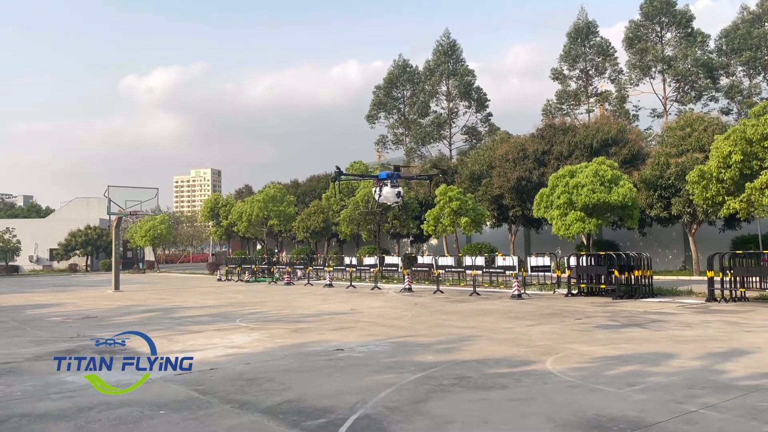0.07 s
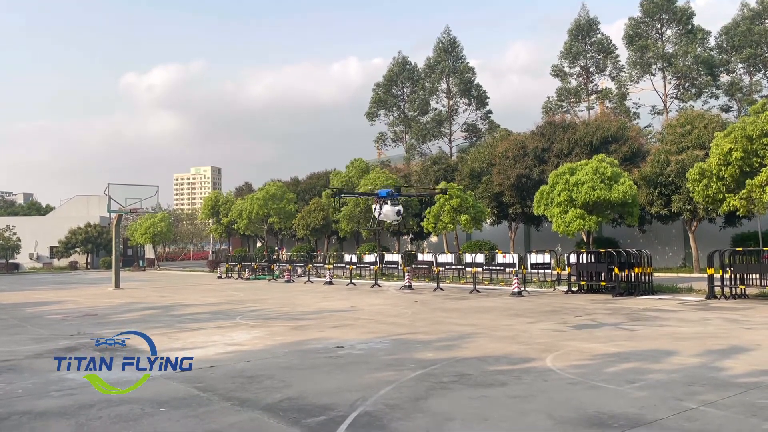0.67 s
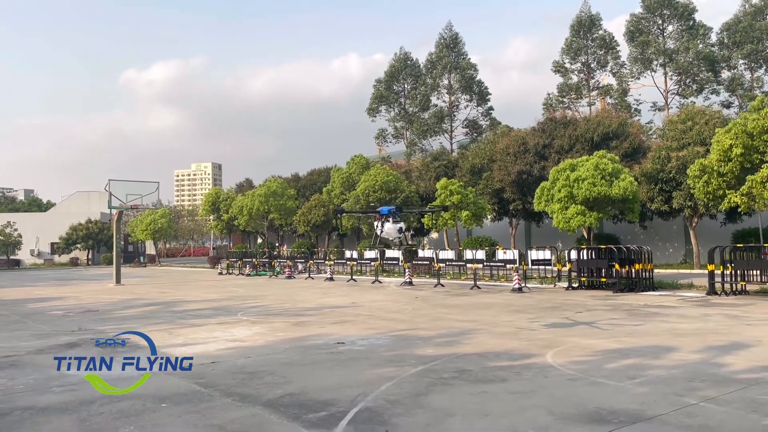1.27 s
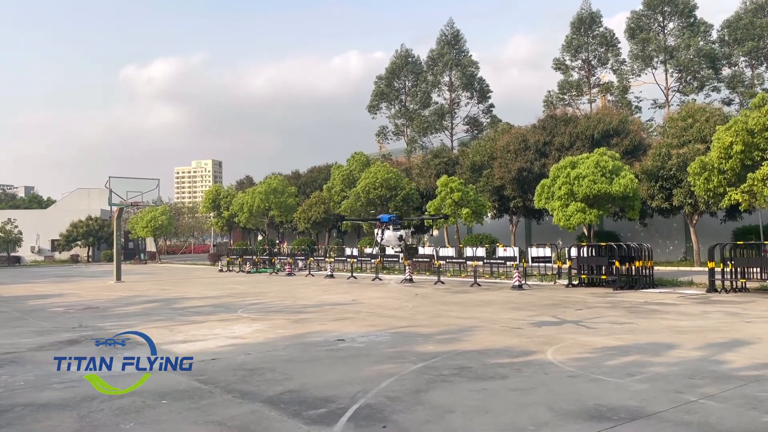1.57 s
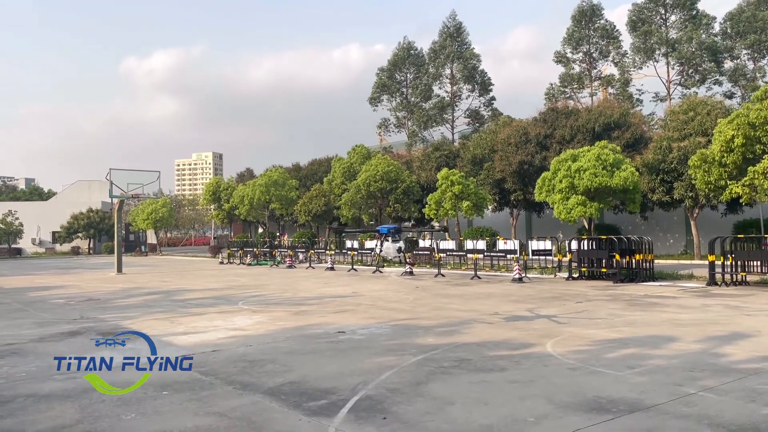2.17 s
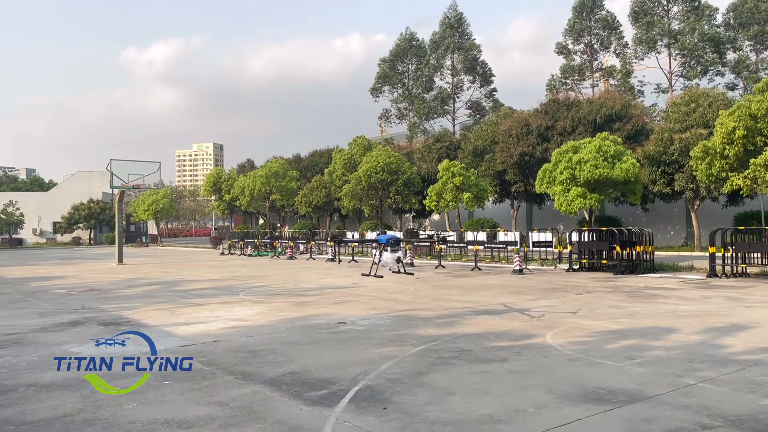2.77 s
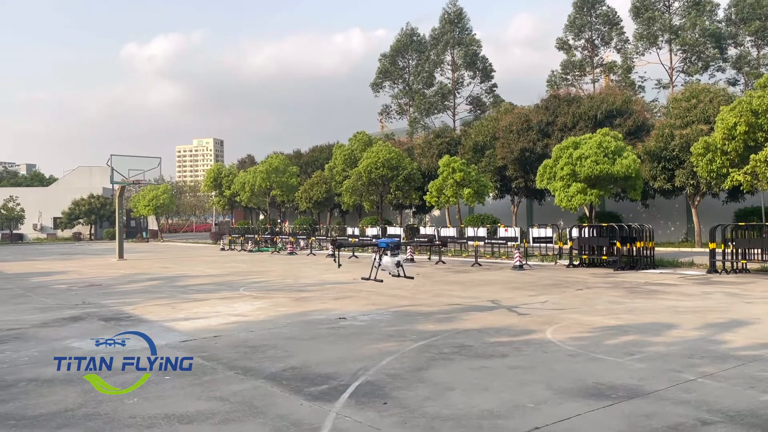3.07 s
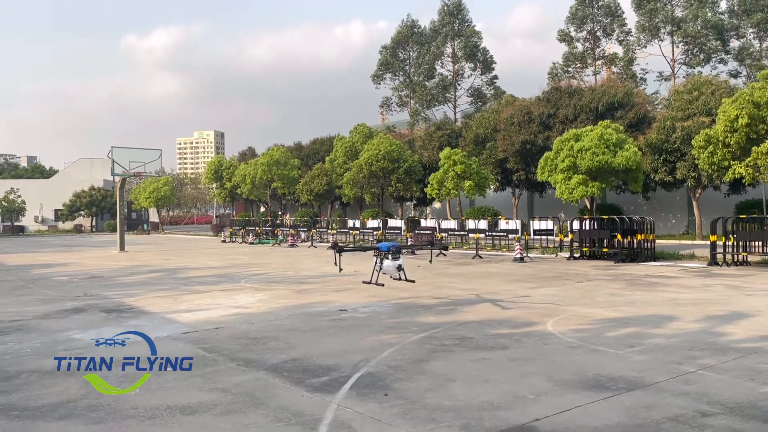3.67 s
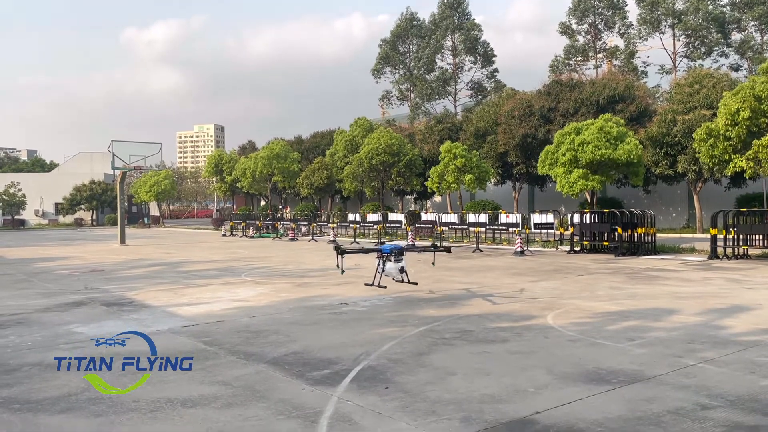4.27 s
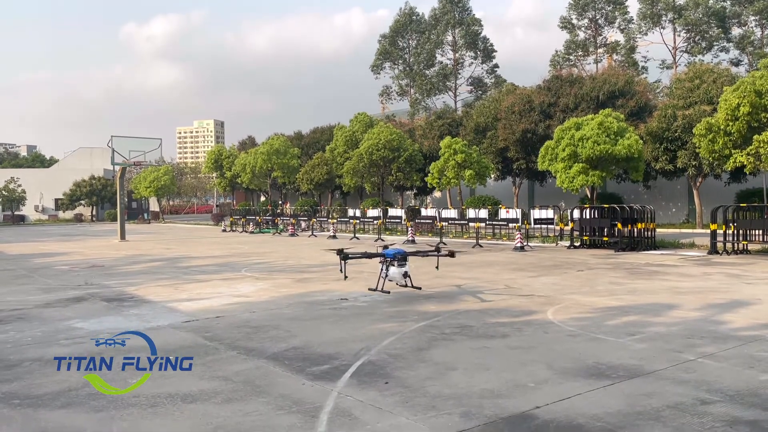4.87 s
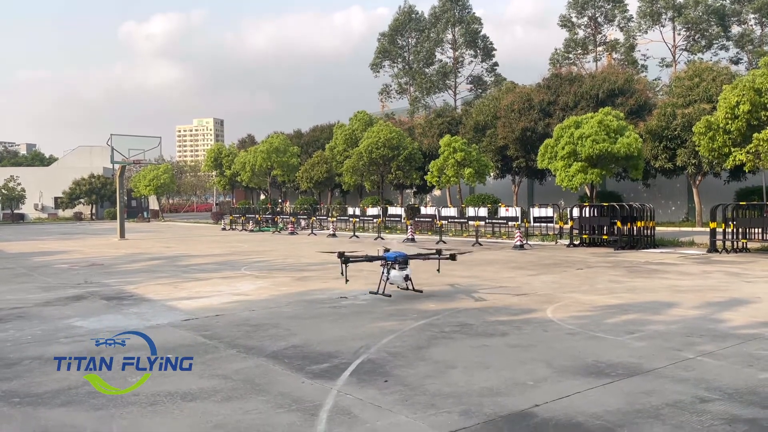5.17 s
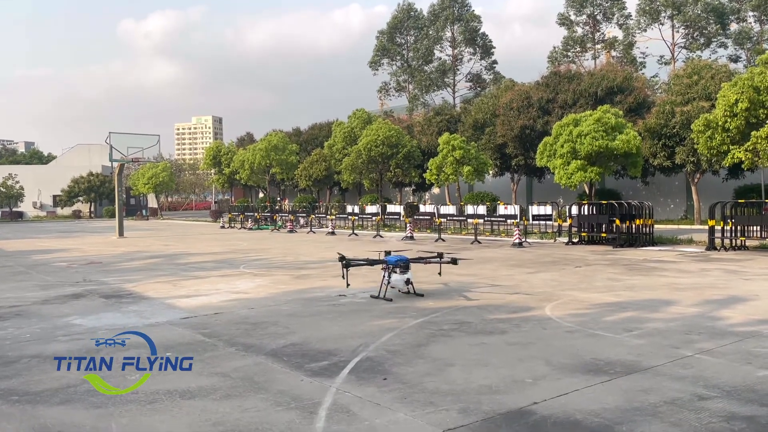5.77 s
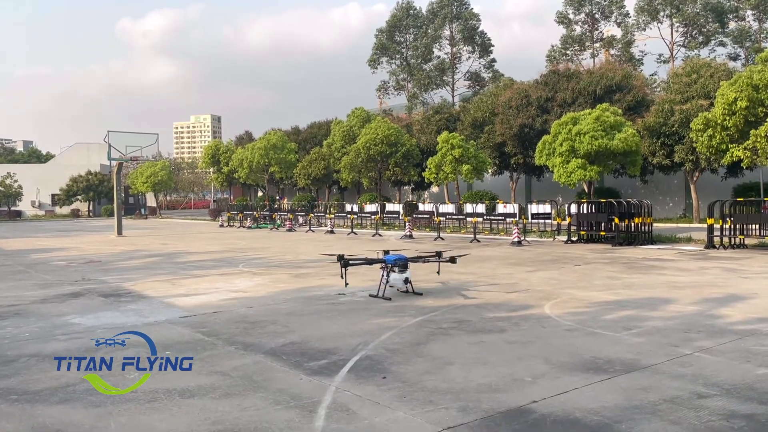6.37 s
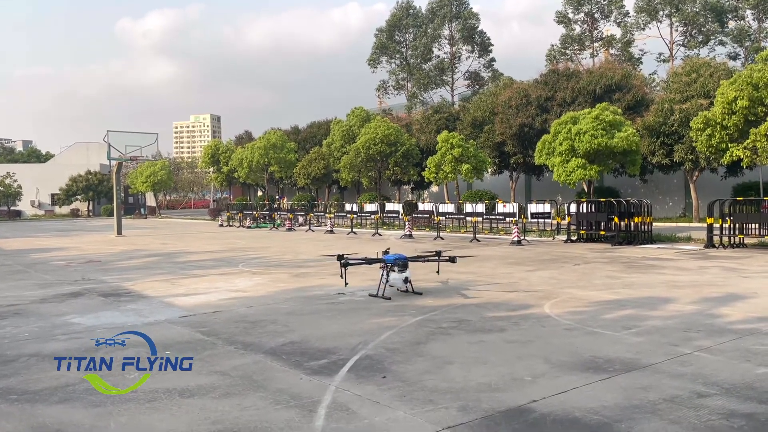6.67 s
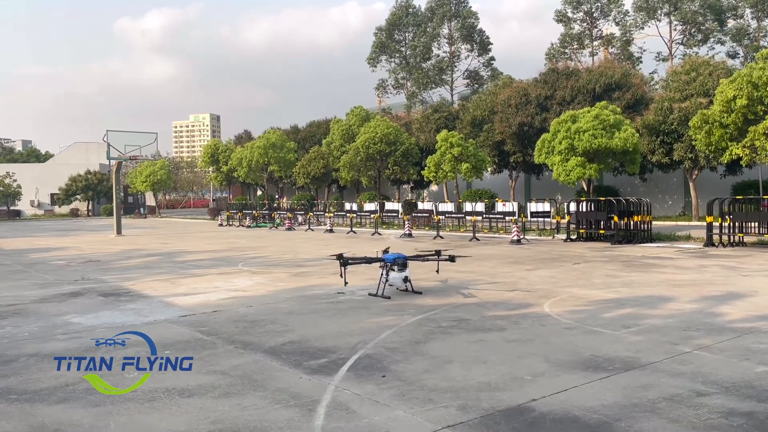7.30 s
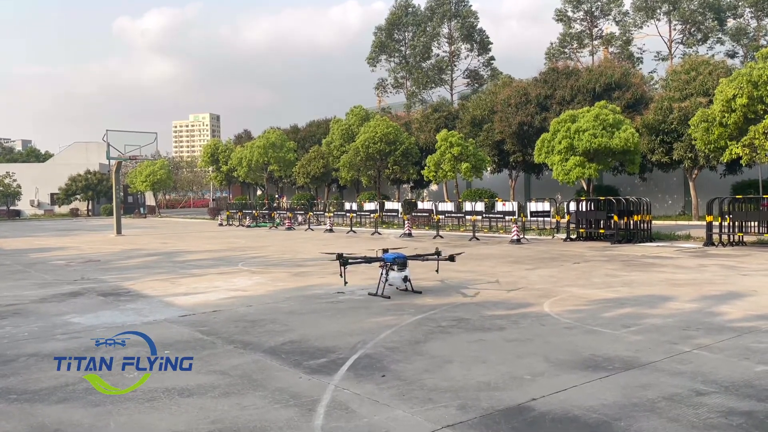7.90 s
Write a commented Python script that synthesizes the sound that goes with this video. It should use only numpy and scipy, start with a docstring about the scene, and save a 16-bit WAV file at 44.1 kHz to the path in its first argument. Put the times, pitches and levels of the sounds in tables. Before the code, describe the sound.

A large six-rotor drone descends over an open concrete court, close to a stereo microphone. Its blades give a throbbing hum and a choppy, hissing buzz, with a faint high electronic whine above and downwash rumbling below. At touchdown the hum surges twice and gusts thump the microphone. The motors whine and squeak as they slow to idle, and dry litter scrapes faintly over the ground.

```python
"""A large six-rotor drone lands on an open-air concrete court, close to a two-port stereo microphone.
It sinks from about two metres, blades humming and chopping the air, speed controllers singing high
above, downwash rumbling on the microphone. Near 5.7 s it touches down: the hum surges twice, then gusts
and eddies strike the microphone. The motors whine and squeak as they brake to idle. From 7 s dry litter
scrapes over the concrete, and in the last half second the rotors coast slower still."""
import sys
import numpy as np
from scipy import signal
from scipy.fft import rfft, irfft, next_fast_len
from scipy.io import wavfile
from scipy.ndimage import uniform_filter1d, map_coordinates

SR = 44100
rng = np.random.default_rng(int(sys.argv[2]) if len(sys.argv) > 2 else 0)


def master(y):
    """Save y as 16-bit WAV."""
    cut = np.clip(np.atleast_2d(y).T, -1, 1)
    pcm = np.round(cut * 32767)  # scale
    wavfile.write(sys.argv[1], SR, pcm.astype(np.int16))


N = 354563
T = np.arange(N) / SR
HZ = np.fft.rfftfreq(N, 1 / SR)

# common rotor speed through descent, touchdown, braking, idle, coasting: (time [s], blade rate [Hz])
BLADE_RATE = [(0, 72.1), (1.4, 71.4), (2.36, 71.4), (2.8, 73), (3.7, 72.9), (4.4, 70.6), (5.58, 69.7),
              (5.76, 62.7), (5.95, 62.6), (6.25, 58.4), (6.37, 51), (6.56, 36.8), (6.67, 29.8),
              (6.76, 34.3), (6.9, 30.9), (7.15, 29.2), (7.59, 28.8), (8.04, 22)]
# rotors above the concrete: (time [s], height [m])
ROTOR_HEIGHT = [(0, 1.86), (1, 1.68), (2, 1.17), (3, 1.04), (5.7, 1.12)]
# each rotor against the common speed, before TRIM_SPREAD scales it: (blade rate offset [Hz])
ROTOR_TRIM = [-1.9, -.8, -.2, .35, 1, 2.1]
# the rotors part most while the drone steadies near the ground: (time [s], offset scale [ratio])
TRIM_SPREAD = [(1, 0.86), (2.2, 0.39), (2.8, 1.15), (3.7, 1.25), (4.6, 0.51)]
# each rotor at the microphone, the nearest loudest: (relative level [dB])
ROTOR_NEARNESS = [1, -7.5, -3.5, -2, 6, -6.5]
# first blade tone, the deep hum, at hovering speed: (time [s], relative level [dB])
HUM_LEVEL = [(0, -36), (.2, -33), (.65, -32.5), (.85, -30.5), (1.03, -39), (1.2, -29), (1.33, -35),
             (1.5, -23.5), (1.68, -30), (1.8, -29.5), (2.1, -27), (2.22, -33), (2.66, -34), (2.8, -26.5),
             (3.1, -34.5), (3.35, -28.5), (3.75, -35), (3.97, -24.5), (4.45, -35), (4.72, -24),
             (4.9, -39.5), (5.15, -31), (5.33, -56), (5.9, -40)]
# second and third blade tones at hovering speed: (time [s], second [relative dB], third [relative dB])
OVERTONE_LEVELS = [(0, -36, -40), (1.1, -42.5, -35), (2.1, -40, -35), (2.5, -44.5, -37.5),
                   (3.3, -37, -33.5), (4.5, -35, -33), (4.85, -40.5, -47), (5.15, -40, -34),
                   (5.9, -34, -38.5)]
# higher blade tones at hovering speed: (time [s], fourth tone [dB], all above it [dB])
BUZZ_LEVELS = [(0, -32, -28), (.3, -37.5, -30.5), (.8, -42, -34.5), (1.2, -40.5, -37), (2.2, -40.5, -35.5),
               (2.9, -34, -33.5), (3.6, -37.5, -35), (4.2, -35, -34.5), (4.6, -40.5, -33),
               (5.1, -37.5, -34.5), (5.6, -37.5, -35), (6.15, -36.5, -36)]
# blade tones above the fourth, at the opening speed: (frequency [Hz], relative level [dB])
BUZZ_SPECTRUM = [(365, 1.5), (435, -4.5), (510, -1.5), (580, -2.5), (660, -8.5), (800, -15), (1080, -8),
                 (1500, -15), (2400, -16.5)]
# blade turbulence at hovering speed: (time [s], rush [relative dB], tip hiss [relative dB])
TURBULENCE_LEVELS = [(0, -34.5, -39), (.7, -32.5, -39.5), (2.25, -30.5, -40.5), (2.65, -30, -39),
                     (3.3, -30, -38.5), (4.3, -31.5, -38), (4.95, -34, -40), (5.25, -33.5, -38.5),
                     (5.7, -29, -40.5), (6.3, -35.5, -42.5)]
# rush of air over the blades: (frequency [Hz], relative density [dB])
RUSH_SPECTRUM = [(30, -47), (130, -9.5), (330, 1), (480, -1), (900, -1), (1100, -2), (1500, -5.5),
                 (1780, -13.5), (2100, -6.5), (4000, -24), (16000, -45)]
# hiss of the blade tips: (frequency [Hz], relative density [dB])
TIP_SPECTRUM = [(300, -1.5), (1300, -14), (1800, 1), (2100, 0.5), (3000, 3), (4200, 0.5), (6200, -5),
                (9000, -9.5), (12500, -14.5), (14200, -7), (15300, -48)]
# magnetic whine under braking, at idle and coasting:
# (peak time [s], rise [s], fall [s], level at resonance [dB], pitch [x blade rate], motor's lag [s])
MOTOR_WHINES = [(6.44, .24, .23, -41, 56, .001), (6.44, .035, .05, -44.5, 56, -.033),
                (6.55, .028, .045, -41, 56, -.052), (6.79, .04, .13, -57, 84, .002),
                (6.98, .055, .05, -57.5, 84, .002), (7.135, .04, .055, -56.5, 84, .002),
                (7.31, .055, .045, -57.5, 84, .002), (7.43, .04, .12, -61, 84, .002),
                (7.605, .022, .36, -58.5, 84, -.004)]
# squeaks of the slowing motors: (peak time [s], half length [s], pitch [Hz], width [Hz], level [dB])
MOTOR_SQUEAKS = [(6.19, 0.081, 4420, 60, -53), (6.858, 0.068, 4300, 130, -61),
                 (7.066, 0.037, 4300, 1100, -52), (7.343, .014, 3750, 900, -50)]
# sidebands of the switching tone: (distance below the carrier [x blade rate], relative level [dB])
SWITCHING_SIDEBANDS = [(10, -52), (14.1, -49), (16.3, -51), (19.9, -44), (22, -53)]
# current drawn by the motors: (time [s], relative level [dB])
MOTOR_CURRENT = [(0, 1.5), (5.6, 2), (5.8, -2.5), (6.3, -8), (6.55, -17), (6.7, 1), (6.88, -12),
                 (7.58, -16), (7.68, -40)]
# downwash on the microphone between gusts: (time [s], relative level [dB])
WASH_LEVEL = [(0, -31), (1.5, -31.5), (2.5, -34.5), (3.5, -35.5), (5.2, -33), (5.9, -32), (6.4, -32),
              (6.72, -37.5), (7.3, -33.5), (8.04, -34.5)]
# gusts as the wash spreads along the ground: (peak time [s], half length [s], relative level [dB])
WASH_GUSTS = [(5.68, .09, -34), (6.057, 0.12, -28.5), (6.224, 0.074, -34), (7.12, 0.059, -35),
              (7.42, 0.066, -34)]
# wind noise on the microphone: (frequency [Hz], relative density [dB])
WASH_SPECTRUM = [(18, -39), (35, -8), (55, 6), (90, 2), (140, -2.5), (220, -7), (350, -14), (700, -57),
                 (2000, -61), (8000, -84)]
# low thumps: the blade hum surges twice at touchdown, then eddies strike the microphone:
# (peak time [s], half length [s], frequency [Hz], level [dB])
LOW_THUMPS = [(5.589, 0.045, 73, -20.5), (5.684, 0.051, 67, -21), (6.174, 0.0081, 104, -15),
              (6.392, 0.0067, 84.4, -28), (7.117, 0.024, 87, -27.5), (7.169, 0.0026, 113, -17),
              (7.376, 0.0058, 112, -24)]
# litter blown over the court: (start time [s], length [s], level [dB])
LITTER_SCRAPES = [(7.028, 0.12, -52), (7.287, 0.18, -58), (7.671, 0.14, -51.5), (7.94, 0.051, -49),
                  (7.985, 0.064, -52)]
# dry litter on concrete: (frequency [Hz], relative density [dB])
LITTER_SPECTRUM = [(500, -25), (2000, -3.5), (4000, -3), (6300, -0.5), (9000, -3), (13000, -18),
                   (16000, -8)]
# open air around the court: (frequency [Hz], relative density [dB])
OPEN_AIR_SPECTRUM = [(100, -13), (500, -1.5), (800, -2.5), (1300, -9.5), (2000, -11.5), (4000, -24),
                     (8000, -35), (15000, -37)]
# how alike the two microphone ports hear the scene: (frequency [Hz], likeness [0 to 1])
PORT_LIKENESS = [(60, .95), (140, .88), (330, .74), (640, .62), (1400, .9), (3000, .93), (6500, .88),
                 (8200, .99), (15000, .99)]
# shading of the right port: (frequency [Hz], left minus right [dB])
PORT_SHADING = [(60, 1), (130, 2.4), (280, 4), (450, 6.8), (700, 6.5), (1200, 3.3), (2380, 4.7), (4400, 4),
                (7500, .2), (15000, 0)]
# phase between the ports: (frequency [Hz], lead of the left [rad])
PORT_LEAD = [(60, 0), (200, .2), (340, .5), (480, 0), (720, -1.1), (1380, -.1), (2840, .3), (6200, -.1),
             (6800, -.9), (7670, -2.9), (8870, -3.4), (10400, -6), (12600, -6.5), (14200, -9.1),
             (15700, -9.4)]

HOVER_HZ = 72  # blade passes per second
RUSH_LAW_DB, TIPS_LAW_DB, FIZZ_LAW_DB, TONES_LAW_DB = 57, 42.5, 5, 67  # growth per tenfold speed


def rotor_phases(speed, wander_hz, flutter_hz):
    """Blade-pass phase of each rotor; the flight controller keeps trimming every one."""
    spread = curve(TRIM_SPREAD)
    rates = [speed + spread * (trim + wander_hz * drift(1.2)) + flutter_hz * drift(11)
             for trim in ROTOR_TRIM]
    return 2 * np.pi * (np.cumsum(rates, axis=1) / SR + rng.random((len(ROTOR_TRIM), 1)))


def blade_hum(speed, gains_db, beat_hz, beat_wander, stray_gains, waver_rad):
    """The three lowest blade tones throb as a faster and a slower rotor slip in and out of step."""
    phase = 2 * np.pi * np.cumsum(speed) / SR
    ahead, behind = (
        2 * np.pi * (np.cumsum(beat_hz * (1 + beat_wander * drift(1.5))) / SR + rng.random())
        for _ in range(2))
    levels = curve(HUM_LEVEL), curve(OVERTONE_LEVELS), curve(OVERTONE_LEVELS, column=2)
    tones = 0
    for k, (level, db, stray_gain) in enumerate(zip(levels, gains_db, stray_gains), 1):
        in_step = np.cos(k * phase + waver_rad * k * drift(5.8))
        strays = np.cos(k * (phase + ahead)) + np.cos(k * (phase - behind))
        tones += amp(level + db) * unit(in_step + stray_gain * strays)
    return tones * speed_gain(speed, TONES_LAW_DB)


def blade_buzz(phases, speed, flicker_db, top_harmonic=33):
    """Each rotor sounds its own fourth and higher blade tones; the one nearest the microphone leads."""
    fourth, upper = np.zeros((2, N))
    harmonics = np.arange(top_harmonic, 4, -1)
    strengths = amp(at_hz(BUZZ_SPECTRUM, harmonics * speed[0]))
    for phase, near_db in zip(phases, ROTOR_NEARNESS):
        first_tone = np.exp(1j * phase).astype(np.complex64)
        fourth_tone = (first_tone * first_tone) ** 2
        weights = strengths * np.exp(2j * np.pi * rng.random(len(harmonics)))
        stack = np.zeros(N, np.complex64)
        for weight in weights.astype(np.complex64):
            stack = (stack + weight) * first_tone  # lifts the stack by one harmonic
        gain = amp(near_db + flicker_db * drift(5))
        fourth += gain * fourth_tone.real
        upper += gain * (stack * fourth_tone).real
    tones = unit(fourth) * amp(curve(BUZZ_LEVELS)) + unit(upper) * amp(curve(BUZZ_LEVELS, column=2))
    return tones * speed_gain(speed, TONES_LAW_DB)


def blade_turbulence(phases, speed, rush_db, tips_db, rush_chop, tips_chop, swell_db, dull_hz):
    """Air torn by the blades flares each time a fast tip sweeps towards the microphone."""
    flares = sum(amp(1.3 * drift(2.12)) * np.exp(1.9 * np.cos(phase)) for phase in phases)
    flares = (flares / flares.mean()) ** ((speed / speed[0]) ** 2)
    rush, tips = (shed_vortices(noise_pair(colour), depth_db=2.0, patch_s=.035, patch_hz=222.8)
                  for colour in (RUSH_SPECTRUM, TIP_SPECTRUM))
    rush *= amp(curve(TURBULENCE_LEVELS) + rush_db + 0.77 * drift(150)) * speed_gain(speed, RUSH_LAW_DB)
    # the top octave holds longer, then dies out by 32 blade passes per second
    dull = irfft(rfft(tips) / np.hypot(1, (HZ / dull_hz) ** 7), N)
    fizz_gain = np.clip((speed - 32) / 15, 0, 1) * speed_gain(speed, FIZZ_LAW_DB)
    tips = dull * speed_gain(speed, TIPS_LAW_DB) + fizz_gain * (tips - dull)
    tips *= amp(curve(TURBULENCE_LEVELS, column=2) + tips_db + 1.27 * drift(220))
    chopped = rush * unit(flares ** rush_chop) + tips * unit(flares ** tips_chop)
    return chopped * amp(swell_db * drift(7))


def shed_vortices(air, depth_db, patch_s, patch_hz):
    """Vortices shed by the blades colour the noise in brief narrow patches."""
    frames = dict(fs=SR, nperseg=512, noverlap=384)
    hz, t, spectra = signal.stft(air, **frames)
    grid = np.meshgrid(hz / patch_hz, t / patch_s, indexing="ij")
    patches = map_coordinates(rng.standard_normal((256, 1024)), grid, order=1, mode="wrap")
    _, coloured = signal.istft(spectra * amp(depth_db * patches), **frames)
    return unit(coloured[:, :N])


def motor_whine(speed, shell_hz, shell_width_hz, flicker_db, flutter_hz):
    """Magnetic ripple sweeps down through the shells' resonance, each motor a little early or late."""
    whine = np.zeros(N)
    for peak_s, rise_s, fall_s, db, multiple, lag_s in MOTOR_WHINES:
        pitch = multiple * np.interp(T - lag_s, T, speed) + flutter_hz * drift(25)
        resonance = 1 / np.hypot(1, 2 * (pitch - shell_hz) / shell_width_hz)
        ripple = unit(np.cos(2 * np.pi * np.cumsum(pitch) / SR))
        whine += amp(db) * swell(peak_s, rise_s, fall_s) * resonance * ripple
    return whine * amp(flicker_db * drift(25))


def motor_squeaks():
    """The slowing motors give brief fuzzy whistles, each a band of noise."""
    white = rfft(rng.standard_normal(N))
    squeaks = np.zeros(N)
    for peak_s, half_s, hz, width_hz, db in MOTOR_SQUEAKS:
        band = unit(irfft(white / (1 + (2 * (HZ - hz) / width_hz) ** 4), N))
        squeaks += amp(db) * swell(peak_s, half_s, half_s) * band
    return squeaks


def speed_controllers(phases, carrier_hz, gain_db, jitter_rad, flicker_db):
    """Switching sidebands climb towards the carrier as the motors slow; the nearest motors stand out."""
    carrier = 2 * np.pi * carrier_hz * T + jitter_rad * drift(63)
    gains = np.array([amp(db + flicker_db * drift(4)) for db in ROTOR_NEARNESS])
    tones = 0
    for multiple, db in SWITCHING_SIDEBANDS:
        per_motor = gains * np.cos(carrier - multiple * phases + drift(4.7))
        tones += amp(db) * unit(per_motor.sum(0))
    return tones * amp(curve(MOTOR_CURRENT) + gain_db)


def downwash(wash_db, gust_db, lumpy_db, dull_hz, likeness):
    """Lumpy low buffeting on both ports, brighter as the drone sinks, gusting along the ground."""
    gusts = sum(amp(db + gust_db) * swell(peak_s, half_s, half_s) for peak_s, half_s, db in WASH_GUSTS)
    level = np.hypot(amp(curve(WASH_LEVEL) + wash_db), gusts)
    left, unrelated = noise_pair(WASH_SPECTRUM)
    eddies = np.array([left, likeness * left + np.sqrt(1 - likeness ** 2) * unrelated])
    eddies /= np.sqrt(uniform_filter1d(eddies ** 2, size=4000, axis=1))  # evens out the level
    dull = irfft(rfft(eddies) / (1 + (HZ / dull_hz) ** 4), N)
    closeness = (ROTOR_HEIGHT[-1][1] / curve(ROTOR_HEIGHT)) ** 2
    return (dull + closeness * (eddies - dull)) * level * amp(lumpy_db * drift(22))


def low_thumps(raggedness):
    """Ragged pressure swings: the blade hum surges twice at touchdown, then eddies hit the microphone."""
    swings = sum(amp(db) * swell(peak_s, half_s, half_s) * np.sin(2 * np.pi * hz * (T - peak_s))
                 for peak_s, half_s, hz, db in LOW_THUMPS)
    low_cut = signal.butter(3, 40, "high", fs=SR, output="sos")
    return signal.sosfiltfilt(low_cut, swings * (1 + raggedness * drift(110)))


def litter(grain_db):
    """Dry bits skid over the concrete in short grainy scrapes."""
    strokes = sum(amp(db) * np.interp(T, [start, start + 0.19 * length, start + length], [0, 1, 0])
                  for start, length, db in LITTER_SCRAPES)
    return noise_pair(LITTER_SPECTRUM) * strokes * unit(amp(grain_db * drift(76)))


def with_ground_echo(direct, strength, lag_s_per_m):
    """The dull echo off the concrete closes in on the direct sound as the drone sinks."""
    dull = signal.sosfiltfilt(signal.butter(2, 2200, fs=SR, output="sos"), direct)
    return direct + strength * np.interp(T - lag_s_per_m * curve(ROTOR_HEIGHT), T, dull)


def court_scatter(direct, t60_s):
    """Trees and walls around the court throw the sound back, as strong as it came."""
    t = T[:SR // 2]
    tail = rng.standard_normal(len(t)) * amp(-60 * t / t60_s)
    return signal.fftconvolve(direct, tail / np.linalg.norm(tail))[:N]


def open_air(level_db):
    """The faint steady ambience around the court."""
    return noise_pair(OPEN_AIR_SPECTRUM) * amp(level_db)


def microphone_ports(direct, diffuse):
    """The left port takes the direct sound; the right hears it shaded, phase-shifted, partly diffuse."""
    size = next_fast_len(N + SR)
    hz = np.fft.rfftfreq(size, 1 / SR)
    likeness = at_hz(PORT_LIKENESS, hz)
    right = likeness * rfft(direct, size) + np.sqrt(1 - likeness ** 2) * rfft(diffuse, size)
    right *= amp(-at_hz(PORT_SHADING, hz)) * np.exp(-1j * at_hz(PORT_LEAD, hz))
    return np.array([direct, irfft(right, size)[:N]])


def amp(db):
    """Decibels to gain."""
    return 10 ** (np.asarray(db) / 20)


def unit(x):
    """Scales to rms 1."""
    return x / np.sqrt(np.mean(abs(x) ** 2) + 1e-20)


def curve(rows, column=1):
    """One column of a time table at every sample."""
    rows = np.array(rows)
    return np.interp(T, rows[:, 0], rows[:, column])


def at_hz(rows, hz):
    """Reads a spectrum table on a log-frequency axis."""
    table_hz, values = np.transpose(rows)
    return np.interp(np.log(hz + 1), np.log(table_hz + 1), values)


def noise_pair(spectrum):
    """Two unrelated noises of one colour."""
    return unit(irfft(rfft(rng.standard_normal((2, N))) * amp(at_hz(spectrum, HZ)), N))


def drift(rate_hz):
    """A smooth random wander of rms about 1."""
    knots = signal.resample_poly(rng.standard_normal(2048), 8, 1)
    return np.interp(T * rate_hz * 16, np.arange(len(knots)), knots)


def swell(peak_s, rise_s, fall_s):
    """A smooth rise to 1 and a smooth fall."""
    return np.exp(-((T - peak_s) / np.where(T < peak_s, rise_s, fall_s)) ** 2)


def speed_gain(speed, law_db):
    """Gain of a sound that grows as a power of the rotor speed, 1 at hover."""
    return amp(law_db * np.log10(speed / HOVER_HZ))


def scene():
    """The landing from the microphone's spot; one speed curve drives blades, motors and controllers."""
    speed = curve(BLADE_RATE)
    phases = rotor_phases(speed, wander_hz=.5, flutter_hz=0.1537)
    hum = blade_hum(speed, gains_db=[-.8, -.3, -.5], beat_hz=2.8, beat_wander=0.311,
                    stray_gains=[.28, .45, .55], waver_rad=0.15)
    hum = hum * amp([[.8], [-.8]])  # its long waves reach both ports almost alike
    tones = blade_buzz(phases, speed, flicker_db=2.0)
    tones += motor_whine(speed, shell_hz=2490, shell_width_hz=560, flicker_db=2.5, flutter_hz=13)
    tones += motor_squeaks()
    tones += speed_controllers(phases, carrier_hz=15070, gain_db=1.0, jitter_rad=0.59, flicker_db=4.0)
    air = blade_turbulence(phases, speed, rush_db=-0.5, tips_db=3.5, rush_chop=0.38, tips_chop=0.19,
                           swell_db=0.5, dull_hz=8350)
    air = np.array([with_ground_echo(side, strength=0.19, lag_s_per_m=0.001095) for side in air])
    noises = air + litter(grain_db=2.0) + open_air(level_db=-49.5)
    court = microphone_ports(tones + noises[0], court_scatter(tones, t60_s=0.4) + noises[1])
    thumps = low_thumps(raggedness=0.31)
    wash = downwash(wash_db=-2.05, gust_db=-3.5, lumpy_db=2.0, dull_hz=121, likeness=0.55)
    return hum + court + thumps + wash


def record(dry):
    """The recorder's band ends at 15.7 kHz."""
    low_pass = signal.firwin(511, 15700, window=("kaiser", 9), fs=SR)
    return signal.oaconvolve(dry, low_pass[None], "same")


dry = scene()
out = record(dry)
master(out)
```